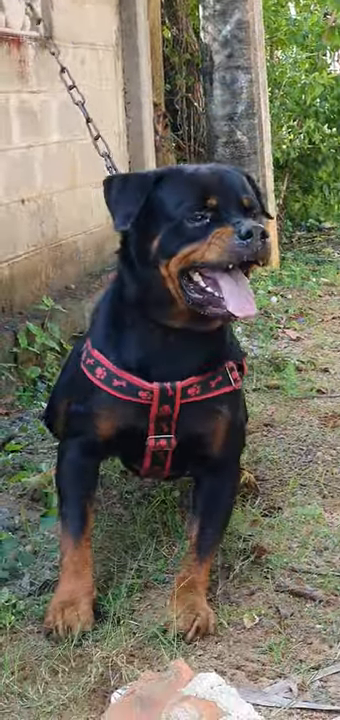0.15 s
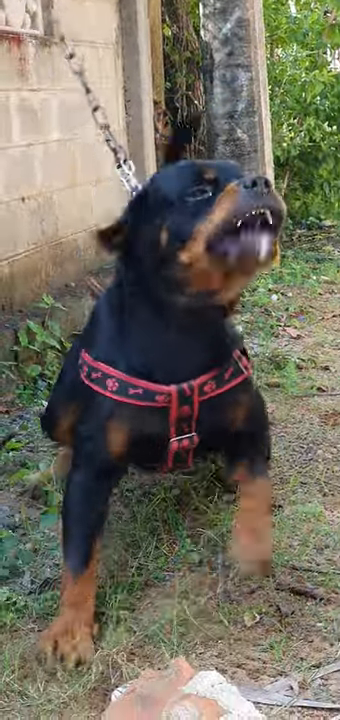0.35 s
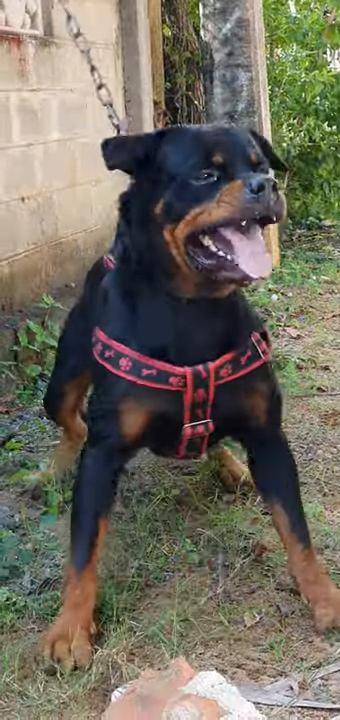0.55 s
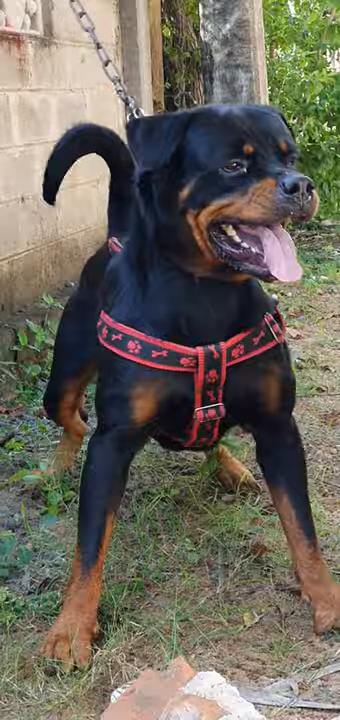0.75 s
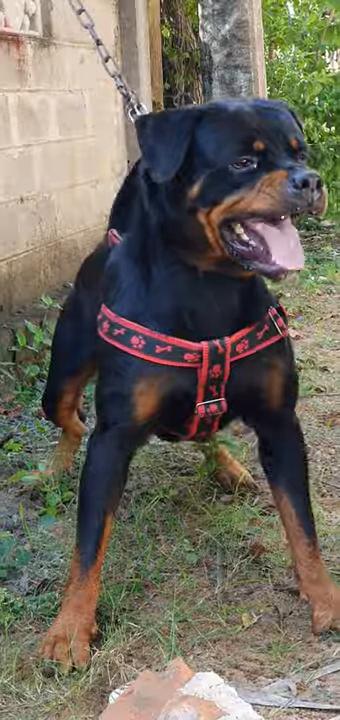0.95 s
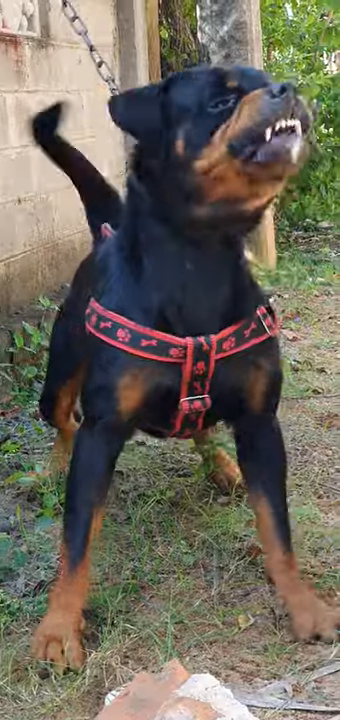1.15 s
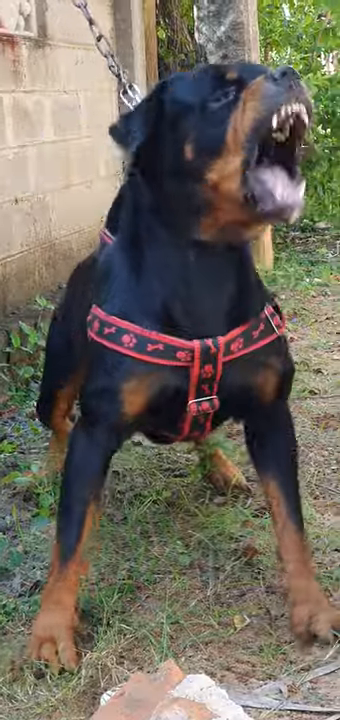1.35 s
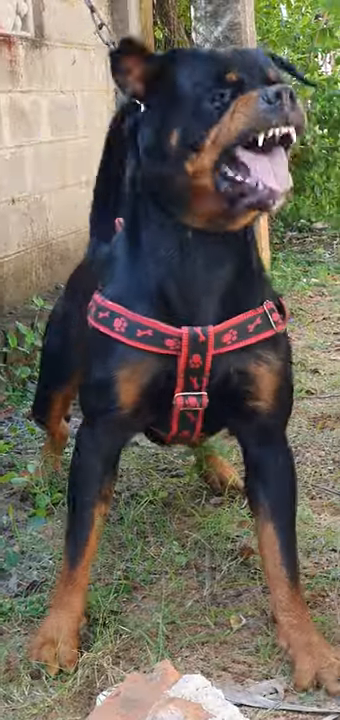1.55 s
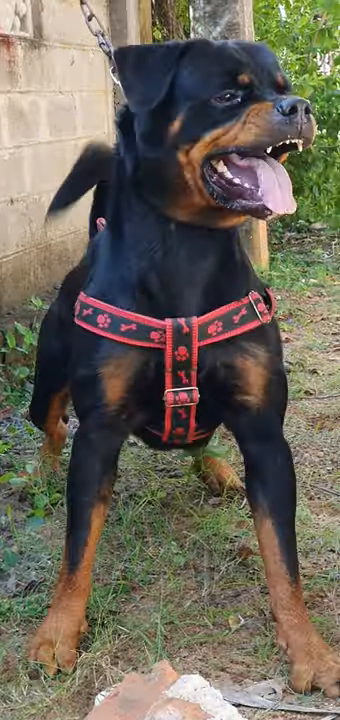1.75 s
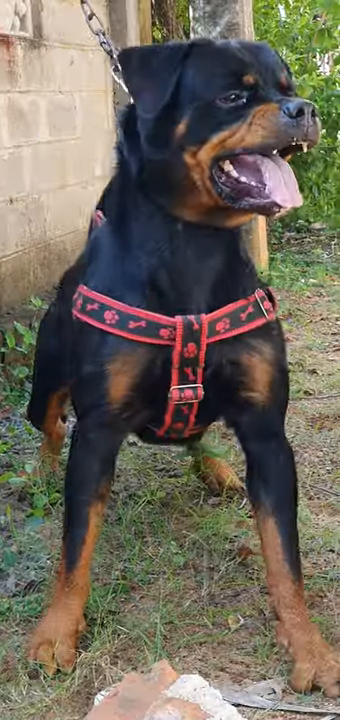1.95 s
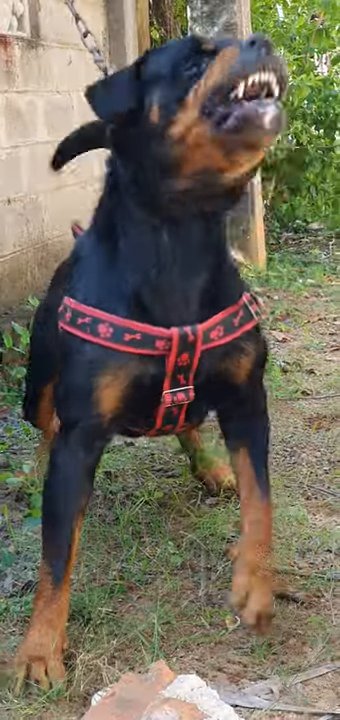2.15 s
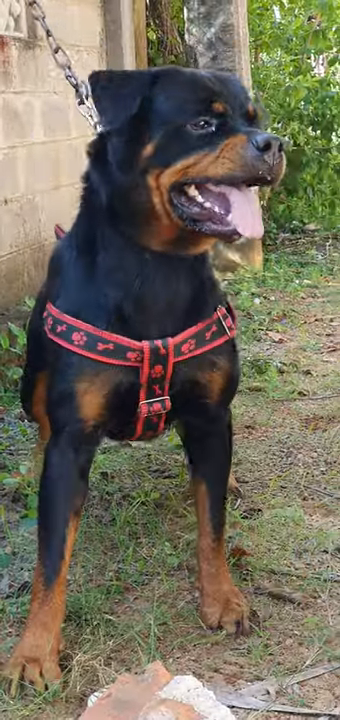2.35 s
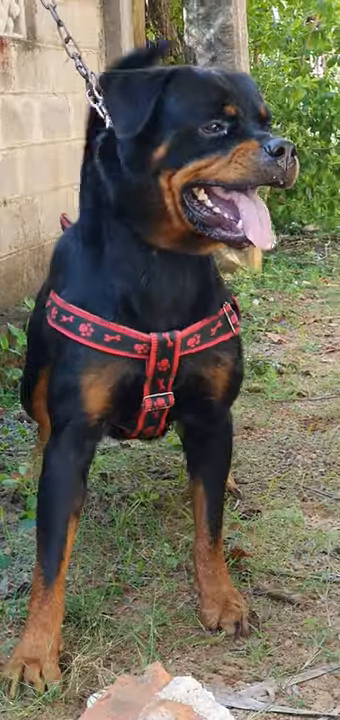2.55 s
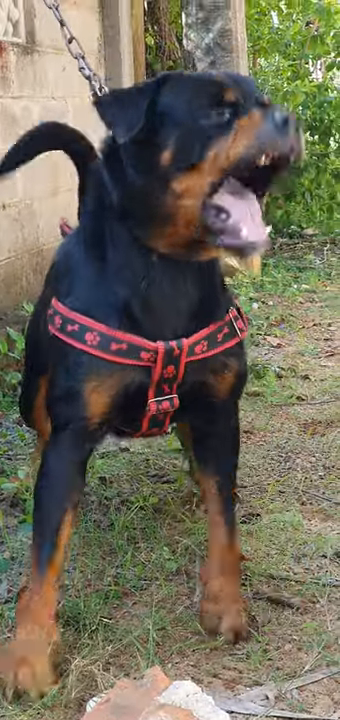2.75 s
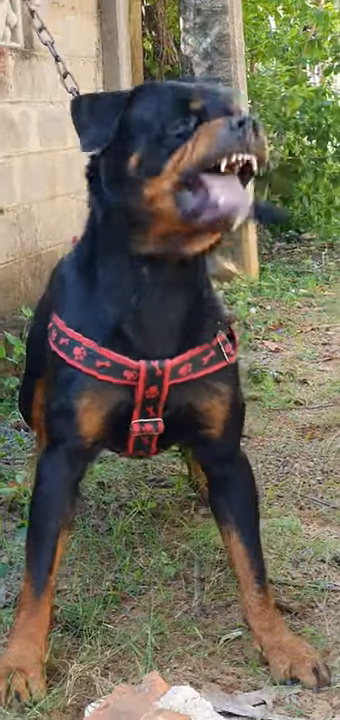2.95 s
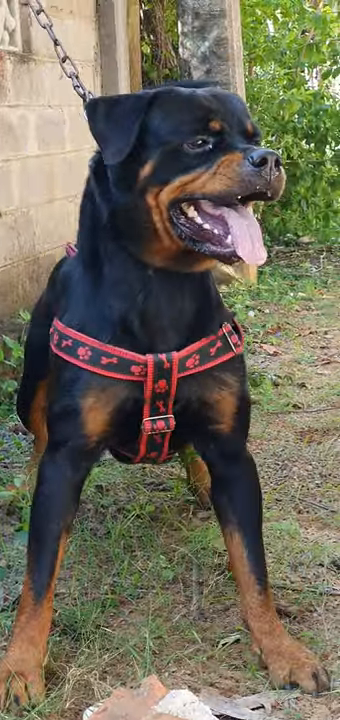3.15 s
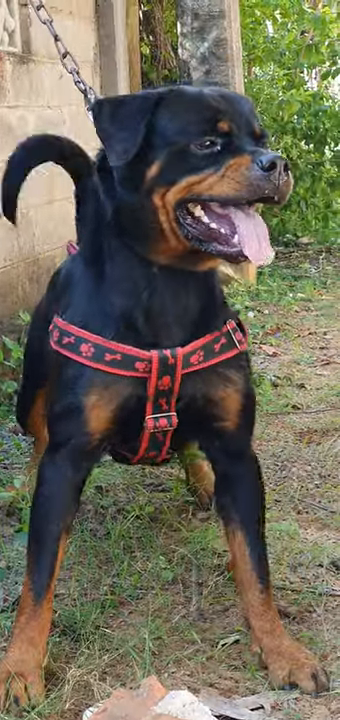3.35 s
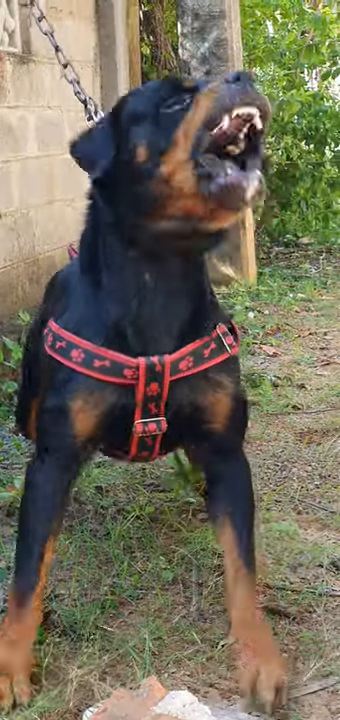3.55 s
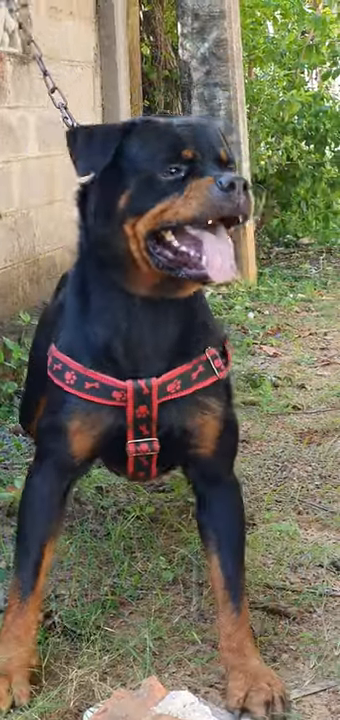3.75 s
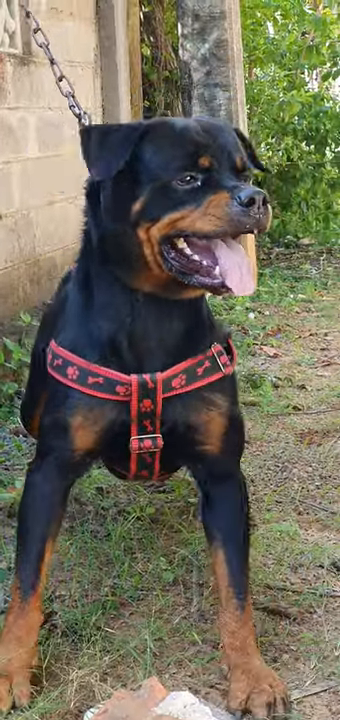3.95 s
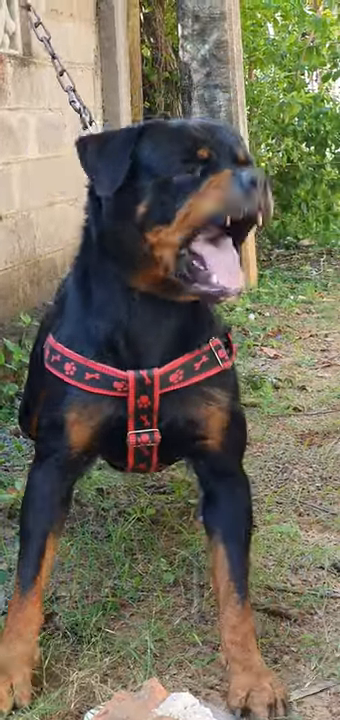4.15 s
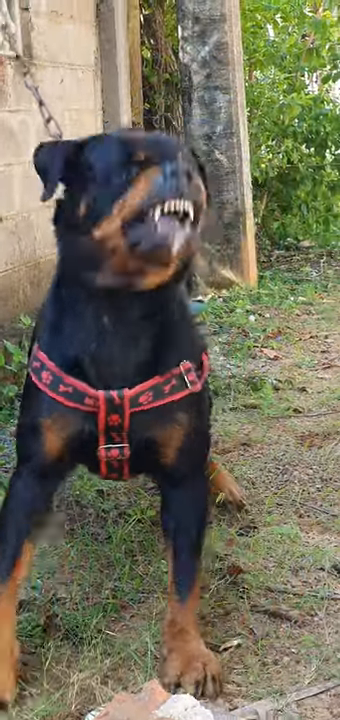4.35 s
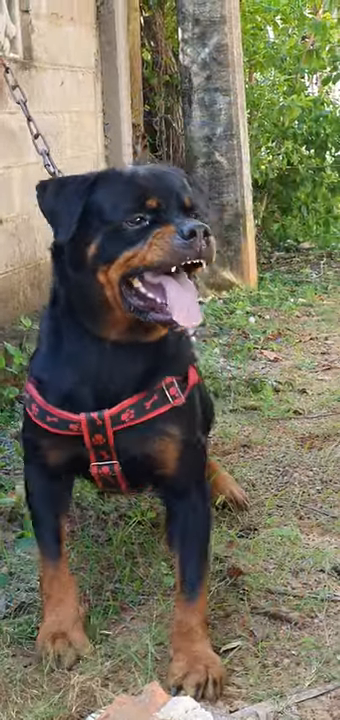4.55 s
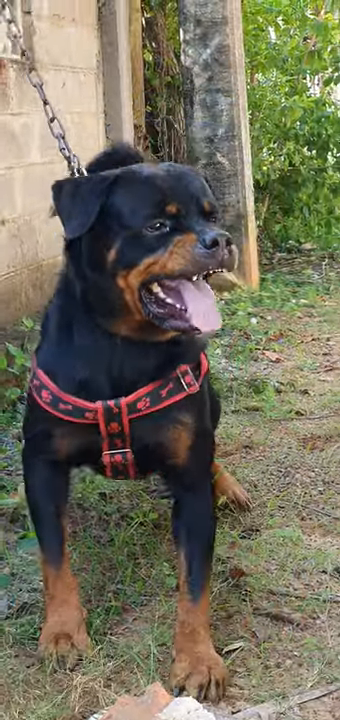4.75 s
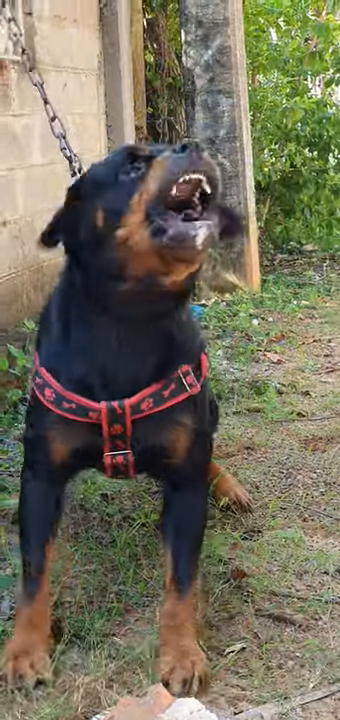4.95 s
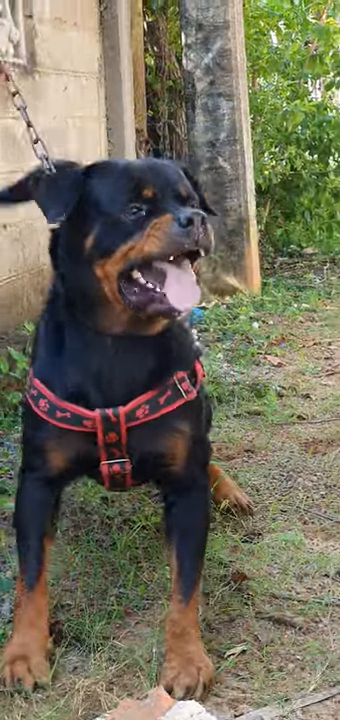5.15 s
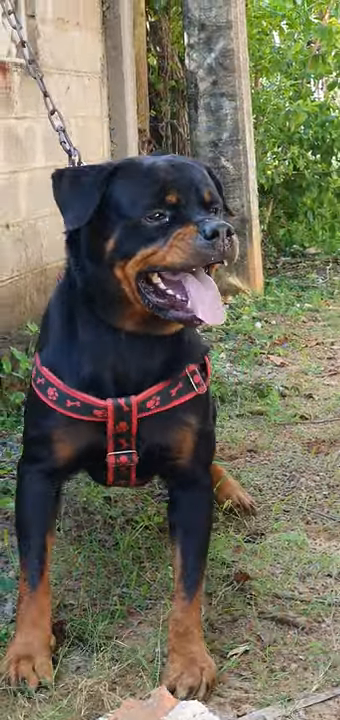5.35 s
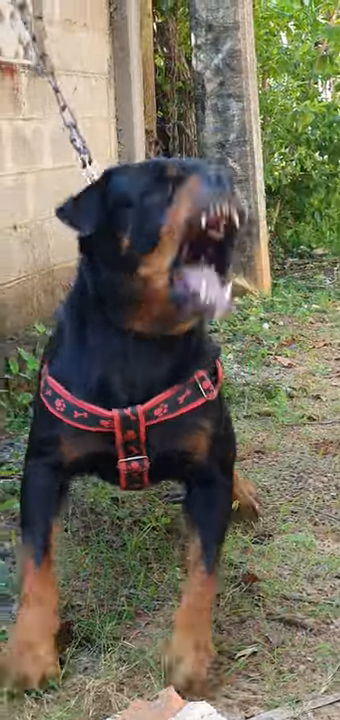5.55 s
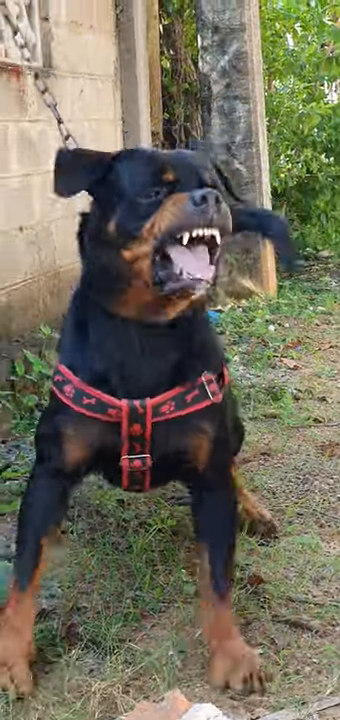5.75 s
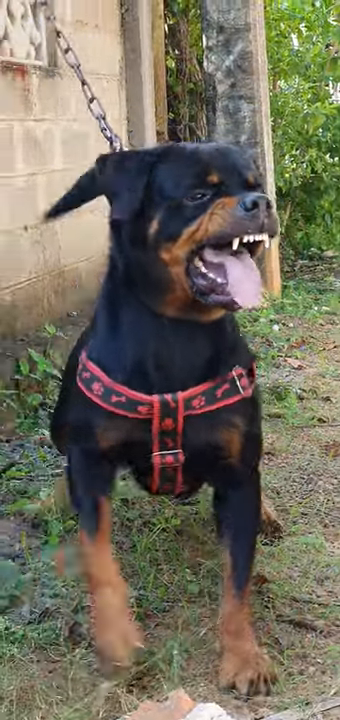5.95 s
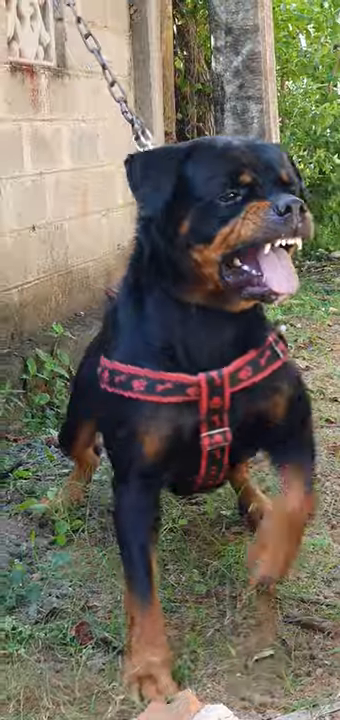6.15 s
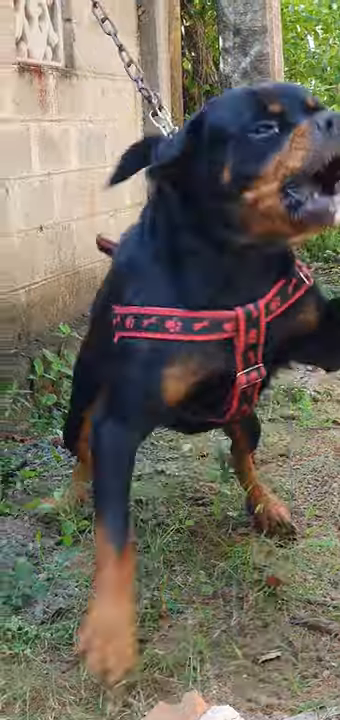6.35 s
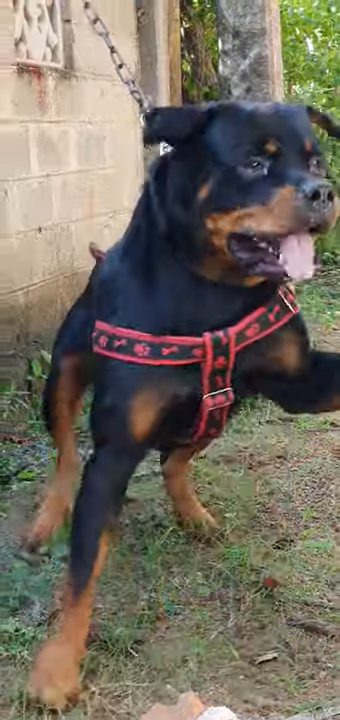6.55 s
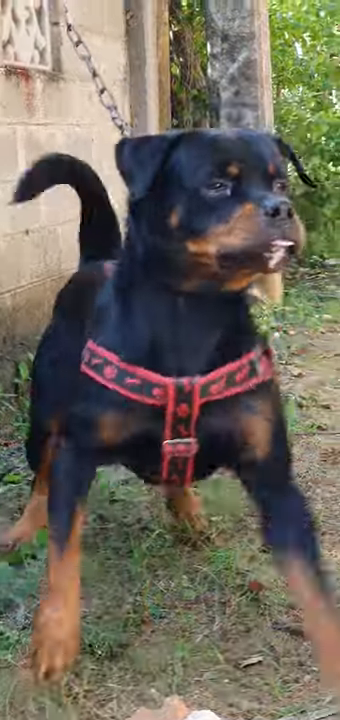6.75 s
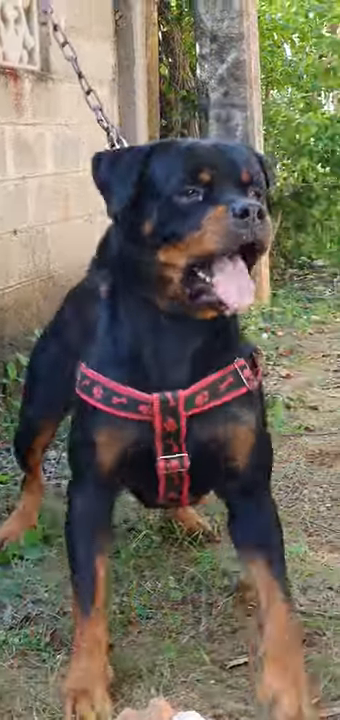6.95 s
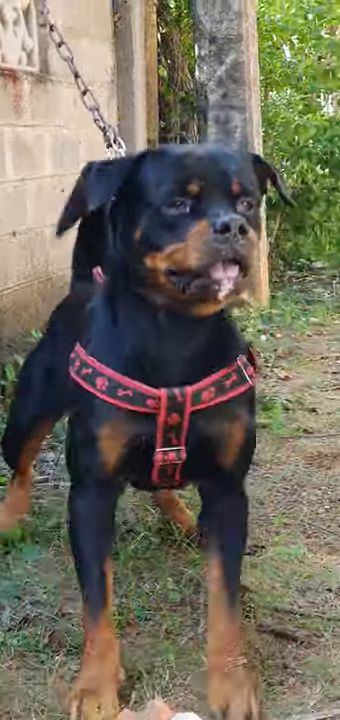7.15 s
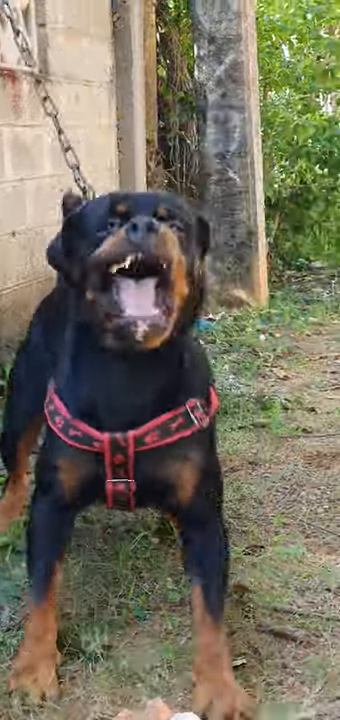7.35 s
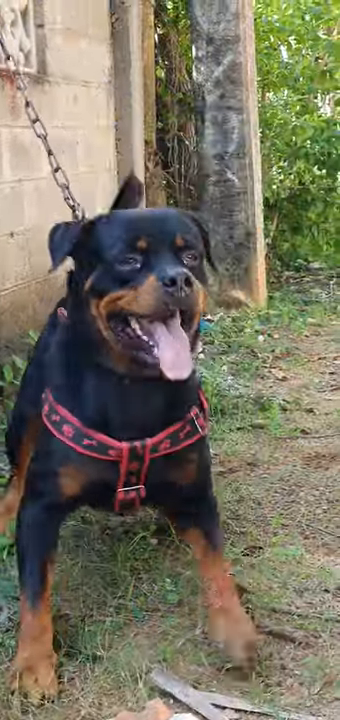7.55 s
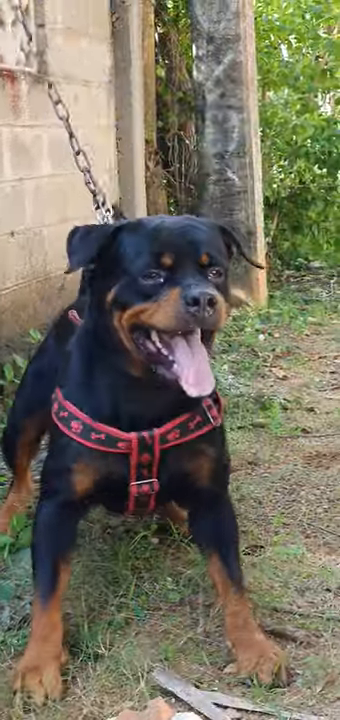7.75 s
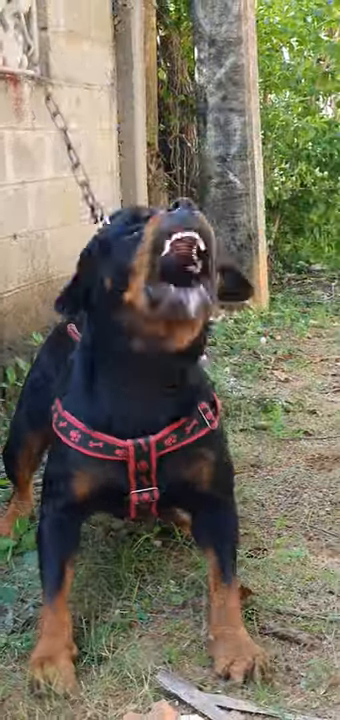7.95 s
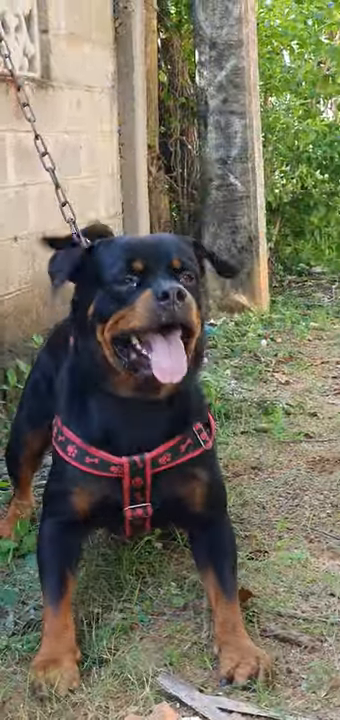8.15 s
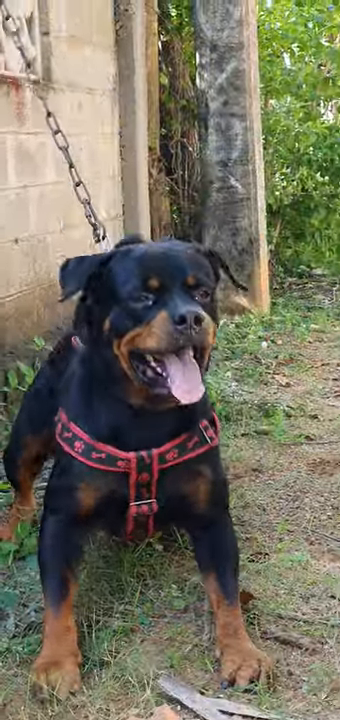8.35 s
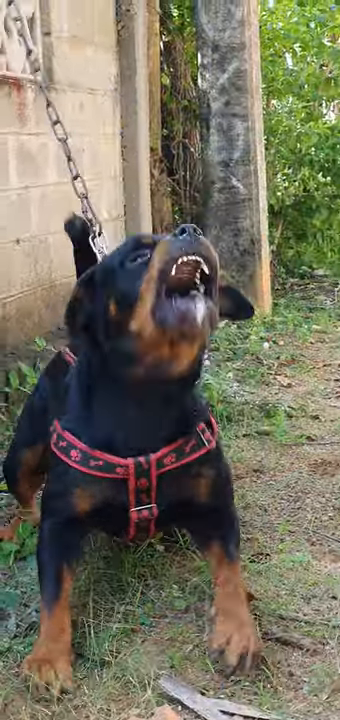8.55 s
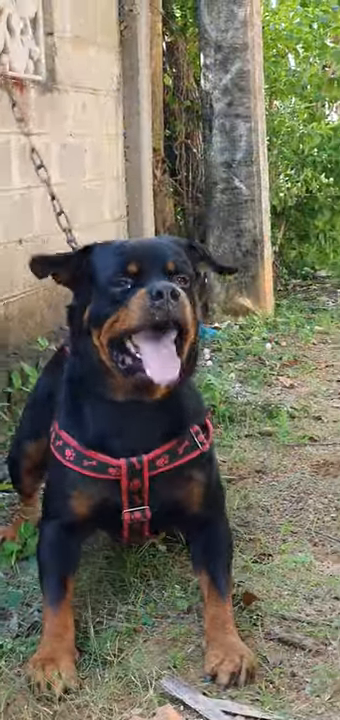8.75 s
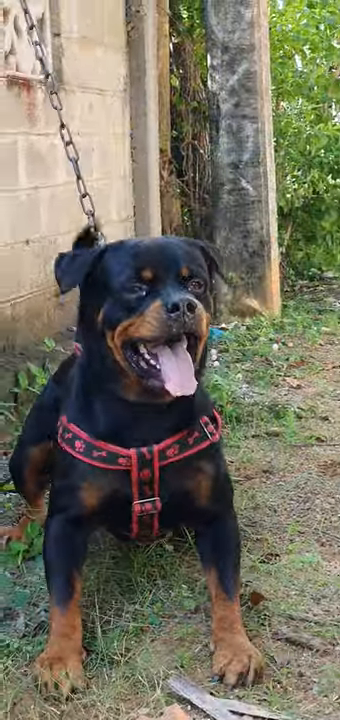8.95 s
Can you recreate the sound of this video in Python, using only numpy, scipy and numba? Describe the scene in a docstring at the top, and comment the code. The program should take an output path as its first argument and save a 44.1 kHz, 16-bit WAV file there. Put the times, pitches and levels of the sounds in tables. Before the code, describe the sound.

A large, heavy dog close to the microphone gives short, hoarse, explosive barks roughly every 0.7 seconds, while a second dog answers with higher, clearer yaps. Between barks come breathy puffs, thin wheezy whines and faint throaty growls. The barks bounce quickly off a wall and the ground, leaving a short diffuse tail over very quiet outdoor noise.

```python
"""Two dogs barking in a walled yard

A big dog with a deep, hoarse bark and a second with a higher, clearer one bark back and forth.
Each bark is an arch of pitch made by vocal fold pulses, mostly clearest near its crest and harsher around it.
Breath noise, thin wheezy whines of gliding tones and low pulsing growls come in between.
Ground and walls throw the sound back as swarms of dying reflections, over quiet outdoor noise."""
import sys
import numpy as np
from scipy import signal
from scipy.fft import rfft, irfft, next_fast_len
from scipy.io import wavfile
from scipy.ndimage import uniform_filter1d, minimum_filter1d
from numba import njit

SR = 44100
rng = np.random.default_rng(int(sys.argv[2]) if len(sys.argv) > 2 else 0)


def store_pcm(level_fs):
    """Save levels as 16-bit WAV."""
    pcm = np.round(np.clip(level_fs, -1, 1) * 32767).astype(np.int16)
    wavfile.write(sys.argv[1], SR, np.atleast_2d(pcm).T)


N = 396900
TIME = np.arange(N) / SR

# barks of the big dog; levels are before the gains of each layer: (start_s, length_s, level_db, brightness_db,
# hiss_db, crest_delay_s, crest_pitch_hz, clear_length_s, clear_roughness_0_to_1, opening_mouth_hz, puff_db)
BIG_DOG_BARKS = [(0.286, 0.14, -10.5, -7.5, -25, 0.072, 549.5, 0.042, 0.48, 1140, -31),
                 (0.999, 0.17, -9.5, -7.5, -27, 0.074, 500.5, 0.033, 0.62, 1250, -50.5),
                 (1.327, 0.13, -7, -8, -24.5, 0.077, 542, 0.053, 0, 1040, -36.5),
                 (2.034, 0.15, -10, -8, -25.5, 0.086, 535.6, 0.051, 0.17, 1250, -34.5),
                 (2.757, 0.14, -8.5, -9, -27.5, 0.07, 538, 0.0537, 0, 1370, -35),
                 (3.468, 0.15, -11.5, -5, -24.5, 0.066, 516.3, 0.05, 0.28, 1380, -34),
                 (4.195, 0.14, -13, -6.5, -26, 0.061, 498.6, 0.066, 0.66, 1140, -34.5),
                 (4.888, 0.13, -11, -9.5, -25.5, 0.068, 531.4, 0.044, 0.21, 1054, -34.5),
                 (5.557, 0.11, -7, -7.5, -24.5, 0.067, 535.4, 0.055, 0.17, 1046, -32.5),
                 (6.271, 0.14, -12, -5, -24.5, 0.059, 491.3, 0.084, 0.52, 970, -36.5),
                 (7.247, 0.13, -13, -4, -20.5, 0.011, 699.3, 0.044, 0.31, 870, -43.5),
                 (7.889, 0.13, -14, -4.5, -19.5, 0.081, 486.2, 0.035, 0.74, 1170, -42),
                 (8.516, 0.12, -10.5, -8, -22.5, 0.067, 539.8, 0.028, 0.25, 1120, -35)]


def from_db(db):
    """Turn decibels into a plain factor."""
    return 10 ** (np.asarray(db) / 20)


def rms_one(x):
    """Scale a sound to an rms of 1."""
    return x / np.sqrt(np.mean(x ** 2) + 1e-20)


def at_hz(points, hz):
    """Read a curve of (Hz, value) points on a log-frequency axis."""
    f, value = np.transpose(points)
    return np.interp(np.log(hz + 1), np.log(f), value)


def bins_hz(size):
    """Frequencies of the spectrum of a sound of this many samples."""
    return np.arange(size // 2 + 1) * SR / size


def colour(x, spectrum):
    """Filter x by a (Hz, dB) spectrum."""
    size = x.shape[-1]
    padded = next_fast_len(size + size // 16, real=True)
    gain = from_db(at_hz(spectrum, bins_hz(padded)))
    return irfft(rfft(x, padded) * gain, padded)[..., :size]


def band(x, low_hz, high_hz, order=4):
    """Keep only the frequencies between two limits."""
    limits = [low_hz, min(high_hz, SR / 2 - 1)]
    return signal.sosfilt(signal.butter(order, limits, "band", fs=SR, output="sos"), x)


def wobble(size, per_s):
    """Random motion of spread 1: straight lines between per_s random points a second."""
    knots = rng.standard_normal(size)
    return rms_one(np.interp(np.arange(size) * per_s / SR, np.arange(size), knots))


def even(x, size=500):
    """Hold the short-term rms at 1."""
    return x / np.sqrt(np.abs(uniform_filter1d(x ** 2, size)) + 1e-9)


@njit
def resonate(x, hz, width_hz, sr):
    """A ringing resonance whose centre and width move; a wider one dies faster."""
    out, state = np.zeros(len(x)), 0j
    for i in range(len(x)):
        state = state * np.exp((-np.pi * width_hz[i] + 2j * np.pi * hz[i]) / sr) + x[i]
        out[i] = state.real
    return out


def outdoor_air():
    """A quiet steady noise, much alike on both sides."""
    # shape of the outdoor noise: (frequency_hz, relative_level_db)
    air_shape = [(15, -18), (25, 0), (36, -3.5), (50, 8.5), (66, -1.5), (119, 4.5), (209, -5.5),
                 (445, -13.5), (552, 0), (703, -11.5), (919, -9), (1380, -7), (1710, -12.5), (2490, -12),
                 (4040, -29), (12500, -55.5), (15500, -39.5)]
    level_db = -51
    shared = rng.standard_normal(N)
    each_side = .2 * rng.standard_normal((2, N))
    return from_db(level_db) * rms_one(colour(shared + each_side, air_shape))


def scatter(x, spectrum, t60, build_s):
    """A swarm of reflections that builds up, then falls 60 dB in t60 seconds."""
    # how alike the reflections are at the two microphone ports: (frequency_hz, likeness_0_to_1)
    likeness = [(200, 0.84), (600, 0.89), (1300, 0.25), (4000, 0.1), (10000, 0)]
    t = TIME[:SR]
    alike = np.clip(at_hz(likeness, bins_hz(SR)), 0, 1)
    different_part = np.sqrt(1 - alike) * rfft(rng.standard_normal((2, SR)))
    shared_part = np.sqrt(alike) * rfft(rng.standard_normal(SR))
    swarm = irfft(different_part + shared_part, SR)
    swarm = rms_one(swarm * from_db(-60 * t / t60) * (1 - np.exp(-t / build_s))) / np.sqrt(SR)
    return signal.fftconvolve(colour(x, spectrum)[None], swarm, axes=1)[:, :N]


def yard(x):
    """Quick scatter from close by and a thin, longer diffuse tail."""
    # scatter off ground, wall and plants close by: (frequency_hz, level_db)
    nearby = [(150, -32), (500, -6.5), (1000, -4), (2500, -4), (5000, -2.5), (14000, -0.5)]
    # diffuse tail of the yard: (frequency_hz, level_db)
    diffuse = [(150, -31.5), (500, -20), (1000, -19), (2200, -19), (3300, -20.5), (5000, -14), (14000, -30)]
    return scatter(x, nearby, t60=0.049, build_s=0.0013) + scatter(x, diffuse, t60=0.43, build_s=0.0062)


def growls(fade_s=0.057):
    """Slow uneven pulses behind closed jaws; the pitch holds, then bends at the end."""
    # growls: (start_s, length_s, first_pitch_hz, last_pitch_hz, level_db)
    growl_rows = [(0.7, 0.82, 127.7, 157.2, -47), (1.48, 0.35, 150.3, 178, -55.5),
                  (3.3, 0.31, 114.2, 141, -50), (3.6, 0.3, 128.9, 160, -48.5), (4.57, 0.13, 141, 128, -49),
                  (6.22, 0.45, 128, 151.5, -52), (8.68, 0.74, 121.3, 130, -51)]
    out = np.zeros(N)
    for start, length, first_hz, last_hz, level_db in growl_rows:
        span = (TIME >= start) & (TIME < start + length)
        t = TIME[span] - start
        glide = first_hz + (last_hz - first_hz) * (t / length) ** 3
        pitch = glide * (1 + 0.063 * wobble(len(t), 113.2))
        phase = 2 * np.pi * np.cumsum(pitch) / SR
        tone = rms_one(np.sin(phase) + 0.58 * np.sin(2 * phase) + 0.31 * np.sin(3 * phase))
        uneven = from_db(level_db + 4.1 * wobble(len(t), 40))
        out[span] += uneven * tone * np.clip(np.minimum(t, length - t) / fade_s, 0, 1)
    return out


def whines(wheeze_swell=1.6, second=.35, third=.6, fourth=.06, reference_db=-42, brightening=.7):
    """Thin rising or sinking tones with wheezy air round them; the louder, the richer in overtones."""
    # whines: (start_s, end_s, first_pitch_hz, last_pitch_hz, tone_db, wheeze_db)
    whine_rows = [(0.084, 0.322, 527, 548, -53, -100.5), (0.639, 0.843, 588, 822, -36.5, -32.5),
                  (0.861, 1.027, 618, 770, -32.5, -39.5), (1.23, 1.401, 624, 727, -36.5, -25.5),
                  (1.932, 2.023, 577, 690, -43, -55), (2.296, 2.783, 560, 532, -57, -69),
                  (3.08, 3.307, 706.3, 869, -43.5, -33), (3.32, 3.497, 657, 800, -35.5, -34.5),
                  (4.075, 4.205, 675, 753, -42, -52), (4.592, 4.885, 585, 562, -49, -51),
                  (5.474, 5.553, 726, 780, -39, -85), (6.448, 6.597, 714.4, 710, -49, -84),
                  (6.875, 7.097, 713, 824, -49.5, -48), (7.146, 7.244, 697, 755, -42.5, -61),
                  (8.148, 8.265, 665, 695, -43.5, -81), (8.391, 8.538, 744, 680, -39, -62),
                  (8.734, 8.901, 724, 636, -43.5, -63.5), (8.87, 9.005, 617, 744, -41, -39.5)]
    # colour of the wheezy air: (frequency_hz, relative_level_db)
    wheeze_colour = [(400, -27), (750, 9), (1000, -5), (1350, 6), (1700, 1), (2200, 11), (3000, 2),
                     (3700, -20.5), (7000, -30), (15000, -40)]
    out = np.zeros(N)
    air = rms_one(colour(rng.standard_normal(N), wheeze_colour))
    for start, end, first_hz, last_hz, tone_db, wheeze_db in whine_rows:
        span = (TIME >= start) & (TIME < end)
        progress = (TIME[span] - start) / (end - start)
        # the pitch glides quickly at first, then levels off
        glide = last_hz + (first_hz - last_hz) * (1 - progress) ** 2
        pitch = glide * (1 + 0.0083 * wobble(len(progress), 121))
        phase = 2 * np.pi * np.cumsum(pitch) / SR
        rich = from_db(brightening * (tone_db - reference_db))
        sizes = (1, rich * second, rich * third, rich * fourth)
        # each overtone has its own random swell
        tone = rms_one(sum(size * np.sin(k * phase) * from_db(3.3 * wobble(len(phase), 39.7))
                           for k, size in enumerate(sizes, 1)))
        swell = np.abs(np.sin(np.pi * progress))
        out[span] += from_db(tone_db) * tone * swell
        out[span] += from_db(wheeze_db) * air[span] * swell ** wheeze_swell
    return out


def puffs(hold_s=0.12, fade_s=0.0743, build_s=0.035):
    """Breath noise as the big dog's lungs go on emptying after each bark, over a very faint floor."""
    # air blown out through the open mouth: (frequency_hz, relative_level_db)
    puff_colour = [(200, -1.5), (450, -1.5), (1100, 2.5), (2200, 4.5), (3100, -3.5), (4000, -7),
                   (7000, -13.5), (10000, -17), (13000, -12), (15500, -34.5)]
    flow = np.zeros(N)
    for start, length, *_, puff_db in BIG_DOG_BARKS:
        since_end = TIME - start - length
        opening = np.interp(since_end, [-build_s, 0.01, hold_s, hold_s + fade_s], [0.073, 0.8, 0.72, 0.073])
        flow += from_db(puff_db) * opening ** 2
    return from_db(0.8 * wobble(N, 70)) * flow * rms_one(colour(rng.standard_normal(N), puff_colour))


def folds(pitch, rough, jitter, shimmer_db, doubling, breath, flutter_db=4.5, count=14):
    """Vocal fold pulses; roughness unsettles timing and strength, doubles the period and lets air through."""
    size = len(pitch)
    unsteady = 1 + jitter * rough * wobble(size, 330) + 0.0076 * wobble(size, 89.3)
    phase = 2 * np.pi * np.cumsum(pitch * unsteady) / SR
    # each overtone swells and sinks on its own, at random
    pulses = rms_one(sum(np.cos(k * phase + k * k / 2) * from_db(flutter_db * wobble(size, 48.9))
                         for k in range(1, count)))
    # every other pulse is stronger when the period doubles
    strength = from_db(shimmer_db * rough * wobble(size, 420)) * (1 + rough * doubling * np.cos(phase / 2))
    air = rms_one(band(rng.standard_normal(size), 158, 4900, order=2)) * (1 + 1.38 * np.cos(phase))
    return strength * (pulses + breath * rough * air)


def envelope(t, length, attack_s, attack_db, peak_share, swell_db, sag_db, close_s, close_db, tail_db_per_s):
    """Force of a bark in dB: quick attack, swell and sag, a drop as the jaws close, a dying tail."""
    peak = length * np.clip(peak_share, .05, .95)
    attack = attack_db * np.minimum(t / attack_s, 0)
    swelling = swell_db * np.clip(1 - t / peak, 0, 1) ** 2
    sagging = sag_db * np.clip((t - peak) / (length - peak), 0, 1) ** 2
    held = swelling + sagging
    release = close_db * np.clip((t - length) / close_s, 0, 1) + tail_db_per_s * np.maximum(t - length, 0)
    return attack - held - release


def bark(row, throat, hiss_colour, chest_shape, body_shape, edge_shape, rise_s, fall_s, clear_lead_s,
         mouth_hz, mouth_close_s, harsh_start, harsh_end, jitter, shimmer_db, doubling, breath, leak,
         clear_width_hz, mouth_width_hz, chest_db, body_db, edge_db, shake_db, groan_db, slack_s,
         hiss_gain_db, hiss_build_s, rasp):
    """One bark, as (first sample, sound): fold pulses shaped by throat and mouth, with hiss and a groan."""
    start, length, level_db, bright_db, hiss_db, crest, crest_hz, clear_length, clear_rough = row
    first = int(max(start - .05, 0) * SR)
    t = (first + np.arange(16384)) / SR - start
    chest_force, body_force, edge_force = (
        level_db + envelope(t, length, **shape) + shake_db * wobble(len(t), 91.3)
        for shape in (chest_shape, body_shape, edge_shape))
    # lung pressure swells and sinks, and the pitch with it; it is halved at rise_s before, fall_s after the crest
    pitch = crest_hz / (1 + ((t - crest) / np.where(t < crest, rise_s, fall_s)) ** 2)
    # the folds lock into a steadier swing for a moment near the crest, but some air always leaks through
    rough = np.interp(t - crest + clear_lead_s, [-.009, 0, clear_length, clear_length + 0.011],
                      [harsh_start, clear_rough, clear_rough, harsh_end])
    leaking = leak * rms_one(band(rng.standard_normal(len(t)), 1540, 3400, order=2))
    voice = colour(folds(pitch, rough, jitter, shimmer_db, doubling, breath) + leaking, throat)
    chest = from_db(chest_force + chest_db) * even(band(voice, 263, 714))
    # the mouth resonance sinks as the jaws close; cleanly closing folds damp it less, so it rings sharper
    centre_hz = mouth_hz * np.exp(-t / mouth_close_s)
    width_hz = clear_width_hz + rough * mouth_width_hz
    body = from_db(body_force + body_db) * even(resonate(band(voice, 604, 1595), centre_hz, width_hz, SR))
    edge = from_db(edge_force + bright_db + edge_db) * even(band(voice, 1630, 4060, order=5))
    # the slackening folds hum on down the slope of the arch; the hum vanishes at the crest
    phase = 2 * np.pi * np.cumsum(pitch * (1 + 0.048 * wobble(len(t), 308.7))) / SR
    slack = np.interp(t, [-.012, 0, crest, length, length + slack_s], [0, 1, 0, 1, 0])
    hum = np.sin(phase) + 0.67 * np.sin(2 * phase)
    groan = from_db(groan_db) * slack * pitch / crest_hz * hum
    # air rushing past the teeth builds as the jaws open, follows the force of the bark and rasps with the folds
    rush = from_db(edge_force + hiss_db + hiss_gain_db) * np.clip(t / hiss_build_s, .2, 1)
    rasping = 1 + rasp * np.cos(phase / 2)
    hiss = rush * rms_one(colour(rng.standard_normal(len(t)), hiss_colour) * rasping)
    return first, chest + body + edge + hiss + groan


def dog(barks):
    """Lay barks out in time, with soft edges at the very start and end of the scene."""
    out = np.zeros(N)
    for first, sound in barks:
        out[first:first + len(sound)] += sound[:N - first]
    return out * np.clip(np.minimum(TIME, TIME[::-1]) / .006, 0, 1)


def high_dog():
    """Lighter folds: an upward sweep, milder at the start, that cracks when its clear stretch ends."""
    # barks; levels are before the gains of each layer: (start_s, length_s, level_db, brightness_db, hiss_db,
    # crest_delay_s, crest_pitch_hz, clear_length_s, clear_roughness_0_to_1, rise_from_half_s, fall_to_half_s)
    bark_rows = [(-0.05, 0.098, -9.5, -2, -27.5, 0.055, 687, 0.0609, 0.37, 0.086, 0.067),
                 (1.429, 0.11, -12, -1.5, -36, 0.084, 728.6, 0.073, 0.18, 0.16, 0.048),
                 (1.705, 0.13, -17, -2, -29, 0.073, 691.6, 0.05, 0.17, 0.086, 0.051),
                 (3.852, 0.11, -13, 0, -24, 0.069, 702.5, 0.063, 0.16, 0.097, 0.063),
                 (4.195, 0.097, -11, -4.5, -28, 0.075, 713, 0.1, 0.39, 0.1117, 0.059),
                 (4.428, 0.12, -14.5, -6, -31, 0.066, 648, 0.066, 0.16, 0.091, 0.081),
                 (5.161, 0.12, -13, -3, -30, 0.067, 703.4, 0.07, 0.25, 0.075, 0.12),
                 (5.737, 0.11, -11.5, -3, -27.5, 0.082, 689.7, 0.042, 0.16, 0.12, 0.05),
                 (6.033, 0.12, -14.5, -1.5, -26.5, 0.07, 650, 0.086, 0.09, 0.11, 0.053),
                 (6.623, 0.11, -14, 1.5, -31, 0.08, 688.5, 0.0684, 0.09, 0.11, 0.071),
                 (7.272, 0.11, -15, 5, -23, 0.069, 707, 0.073, 0.23, 0.104, 0.088),
                 (7.662, 0.12, -14.5, 2.5, -28.5, 0.069, 673, 0.0628, 0.12, 0.099, 0.079),
                 (7.938, 0.095, -16, 1, -30, 0.068, 650, 0.07, 0.26, 0.11, 0.07),
                 (8.262, 0.11, -15.5, -0.5, -34, 0.056, 635.3, 0.0853, 0.05, 0.082, 0.09),
                 (8.987, 0.16, -17.5, -8.5, -28, 0.067, 687, 0.05, 0.42, 0.14, 0.07)]
    # throat and muzzle colour: (frequency_hz, level_db)
    throat = [(200, -24), (330, -13.5), (480, -7), (660, 12.5), (950, -7.5), (1350, 10.5), (1700, 3.5),
              (2050, 9.5), (2600, 9), (2850, 7), (3130, 8), (3350, -14), (3700, -21.5)]
    # colour of the air past the teeth: (frequency_hz, relative_level_db)
    hiss_colour = [(2240, -42.5), (3800, -1), (4100, -16.5), (4980, -16), (5910, 3.5), (6410, -4.5),
                   (7520, -0.5), (8120, -8), (8860, -3.5), (9910, -10.5), (12100, -4), (13400, -13.5),
                   (15500, -19)]
    # how chest, body and bright edge swell and die: times in s, drops in dB, peak as a share of the length
    chest_shape = dict(attack_s=0.037, attack_db=12, peak_share=0.2, swell_db=12.5, sag_db=5.5, close_s=0.024, close_db=11, tail_db_per_s=218.5)
    body_shape = dict(attack_s=0.018, attack_db=19, peak_share=0.72, swell_db=5, sag_db=14, close_s=0.017, close_db=7, tail_db_per_s=280)
    edge_shape = dict(attack_s=0.015, attack_db=20.5, peak_share=0.27, swell_db=8.5, sag_db=11.5, close_s=0.014, close_db=10, tail_db_per_s=313)
    tear = dict(harsh_start=.4, harsh_end=.6, jitter=.05, shimmer_db=3.3, doubling=1.1, breath=.5, leak=.11)
    mouth = dict(mouth_hz=1506, mouth_close_s=4.5, clear_width_hz=1000, mouth_width_hz=100)
    levels = dict(chest_db=-6.0, body_db=-4.0, edge_db=0, shake_db=2.16, groan_db=-38.5, hiss_gain_db=0.5)
    timing = dict(clear_lead_s=0.068, slack_s=.13, hiss_build_s=0.0069)
    return dog(bark(row, throat, hiss_colour, chest_shape, body_shape, edge_shape, rise_s=rise_s, fall_s=fall_s,
                    rasp=0.28, **tear, **mouth, **levels, **timing)
               for *row, rise_s, fall_s in bark_rows)


def deep_dog():
    """Heavy folds: very rough at the start and the end, with strong period doubling."""
    # throat and muzzle colour: (frequency_hz, level_db)
    throat = [(200, -16), (350, -19), (450, -5), (540, -3), (680, 4), (880, -2), (1060, 3), (1400, 5.5),
              (1700, 1.5), (2050, 3.5), (2600, -6.5), (3100, -12.5), (3600, -17)]
    # colour of the air past the teeth: (frequency_hz, relative_level_db)
    hiss_colour = [(2060, -38), (3500, -29), (3770, -9), (4010, -10), (4720, -0.5), (5760, -2.5),
                   (6250, -7), (7070, -3.5), (8260, -13.5), (10200, -15), (11900, -11), (13300, -11.5),
                   (15500, -28)]
    # how chest, body and bright edge swell and die: times in s, drops in dB, peak as a share of the length
    chest_shape = dict(attack_s=0.013, attack_db=14.5, peak_share=0.73, swell_db=10, sag_db=8, close_s=0.075, close_db=12, tail_db_per_s=155)
    body_shape = dict(attack_s=0.009, attack_db=22, peak_share=0.4, swell_db=3.5, sag_db=13, close_s=0.024, close_db=9.5, tail_db_per_s=187)
    edge_shape = dict(attack_s=0.013, attack_db=23, peak_share=0.22, swell_db=2.5, sag_db=13, close_s=0.014, close_db=17, tail_db_per_s=217.5)
    tear = dict(harsh_start=.95, harsh_end=.75, jitter=.085, shimmer_db=3.8, doubling=.95, breath=.45, leak=.28)
    mouth = dict(mouth_close_s=0.34, clear_width_hz=160, mouth_width_hz=410)
    levels = dict(chest_db=-7.5, body_db=1.0, edge_db=3, shake_db=2.0, groan_db=-37.5, hiss_gain_db=3.0)
    timing = dict(rise_s=0.14, fall_s=0.115, clear_lead_s=0.0244, slack_s=.1, hiss_build_s=0.032)
    return dog(bark(row, throat, hiss_colour, chest_shape, body_shape, edge_shape, mouth_hz=mouth_hz,
                    rasp=0.23, **tear, **mouth, **levels, **timing)
               for *row, mouth_hz, _ in BIG_DOG_BARKS)


def ports(x, lead, balance):
    """Direct sound at the two microphone ports, with a lead and a level difference at each frequency."""
    hz = bins_hz(2 * N)
    tilt = from_db(at_hz(balance, hz) / 2) * np.exp(.5j * at_hz(lead, hz))
    return irfft(rfft(x, 2 * N) * np.array([tilt, 1 / tilt]))[:, :N]


def scene():
    """Both dogs, each reaching the ports from its own side, with the yard's reflections and outdoor noise."""
    # how far left leads right, for the big dog and the second: (frequency_hz, lead_radians)
    deep_lead = [(100, 0), (260, 0.1), (400, -0.4), (700, -0.1), (900, 0.9), (1300, 1.0), (1700, 1.8),
                 (2500, 1.9), (4000, 2.9), (7000, 6.5), (15000, 12.0)]
    high_lead = [(100, 0), (300, 0), (600, -0.7), (850, -0.9), (1100, 0.2), (1400, -1.3), (1900, 0.3),
                 (2600, 0.8), (4000, 0), (6000, -1.3), (9000, 2.8)]
    # level difference, for the big dog and the second: (frequency_hz, left_minus_right_db)
    deep_balance = [(100, -0.5), (270, -4), (420, 7), (800, -7), (1000, -3.5), (1300, -1.5), (1900, 1.5),
                    (2400, -1.5), (5000, -1), (8500, 3), (13000, -4)]
    high_balance = [(100, -6.5), (450, 3), (750, 0.5), (950, -15), (1350, 1), (1800, -7), (2700, -0.5),
                    (7000, -6.5), (8400, 5), (13000, -12)]
    near = deep_dog() + puffs() + whines() + growls()
    other = high_dog()
    near_sound = ports(near, deep_lead, deep_balance) + yard(near)
    other_sound = ports(other, high_lead, high_balance) + yard(other)
    return near_sound + other_sound + outdoor_air()


def record(dry):
    """A limiter turns peaks down to full scale, then a steep filter cuts the top."""
    cutoff_hz = 15700
    allowed = 1 / np.maximum(np.abs(dry).max(axis=0), 1)
    gain = uniform_filter1d(minimum_filter1d(allowed, size=301), size=201)
    return signal.sosfilt(signal.ellip(10, .1, 80, cutoff_hz, fs=SR, output="sos"), dry * gain)


dry = scene()
out = record(dry)
store_pcm(out)
```